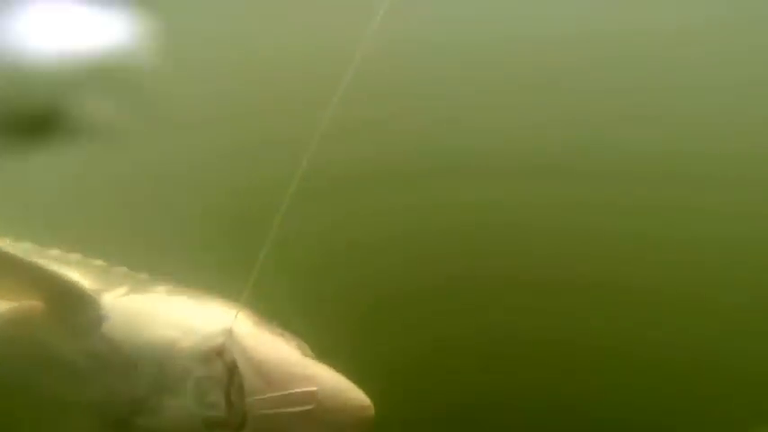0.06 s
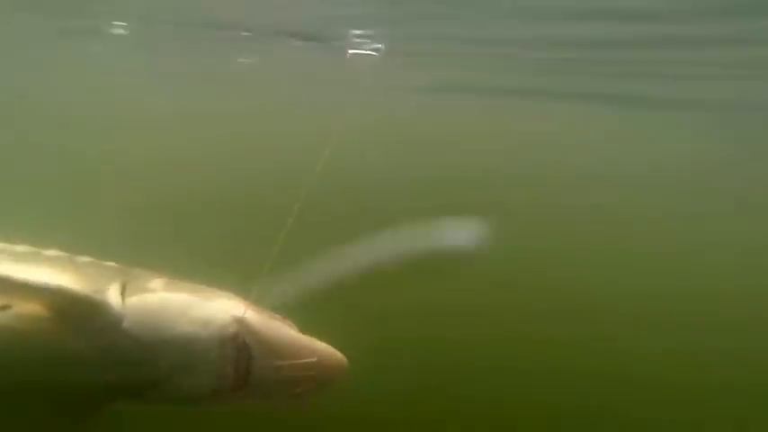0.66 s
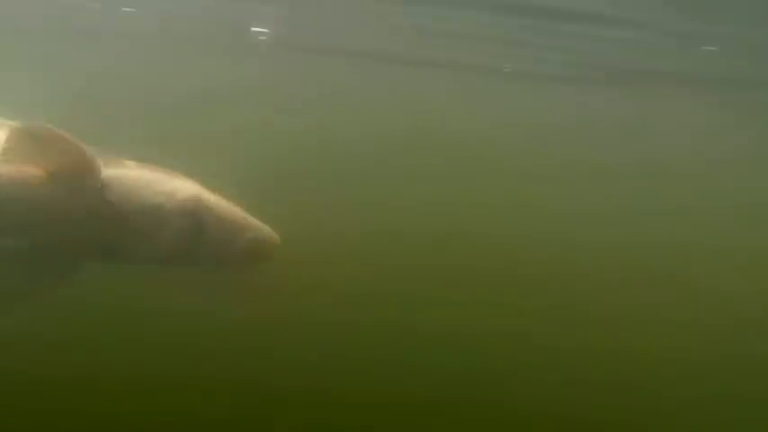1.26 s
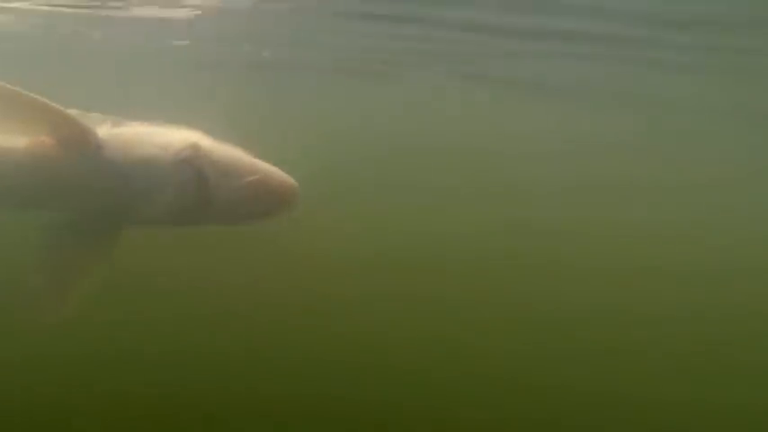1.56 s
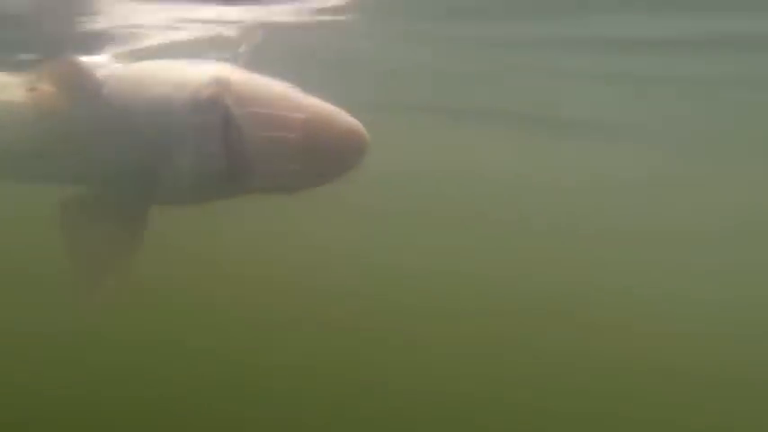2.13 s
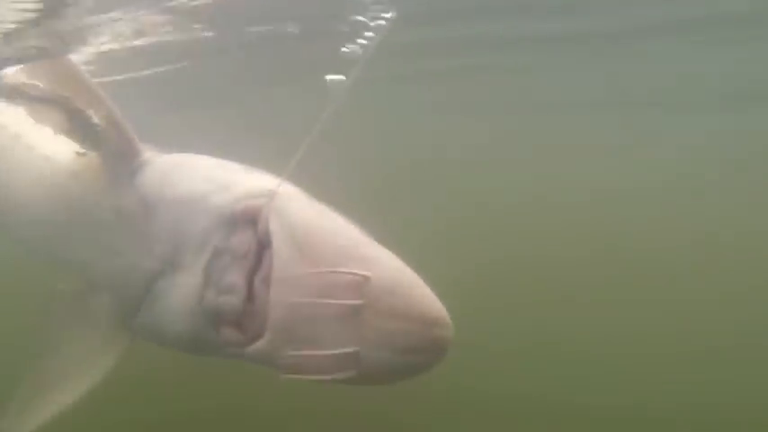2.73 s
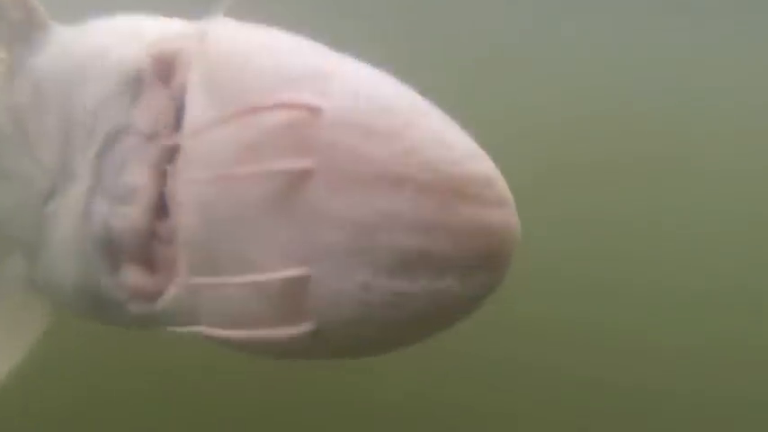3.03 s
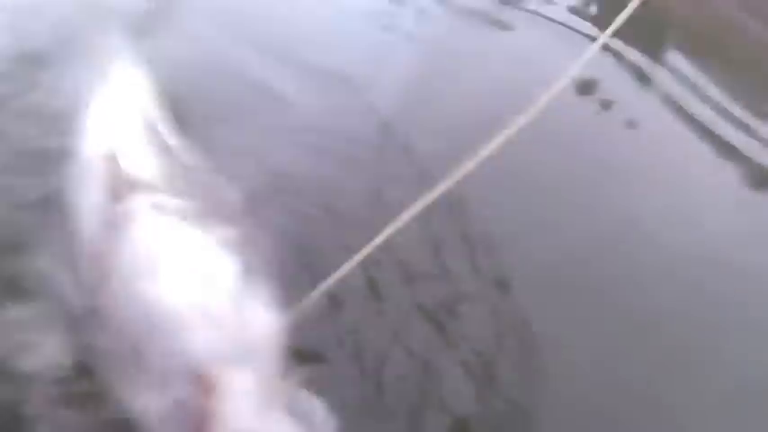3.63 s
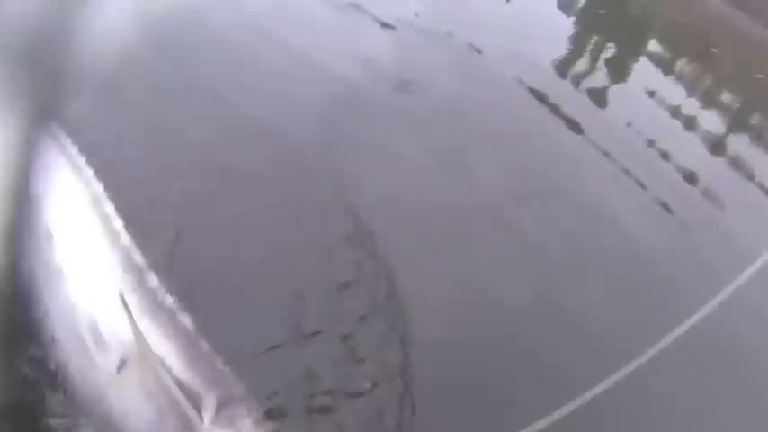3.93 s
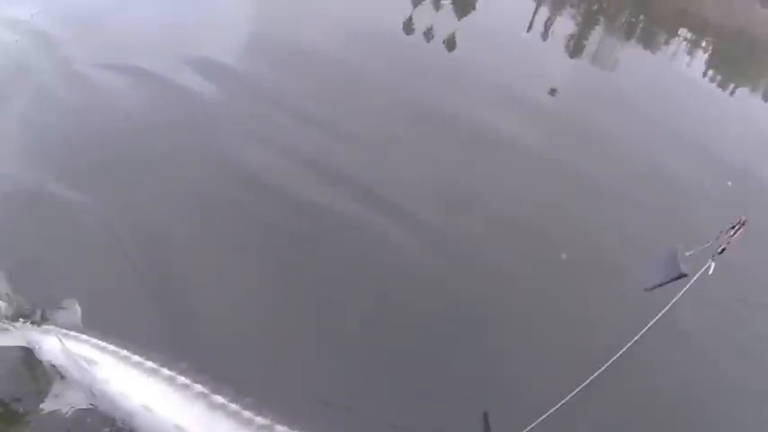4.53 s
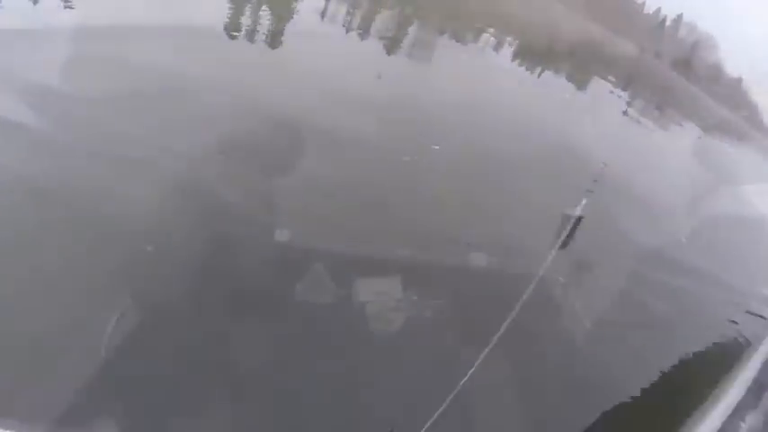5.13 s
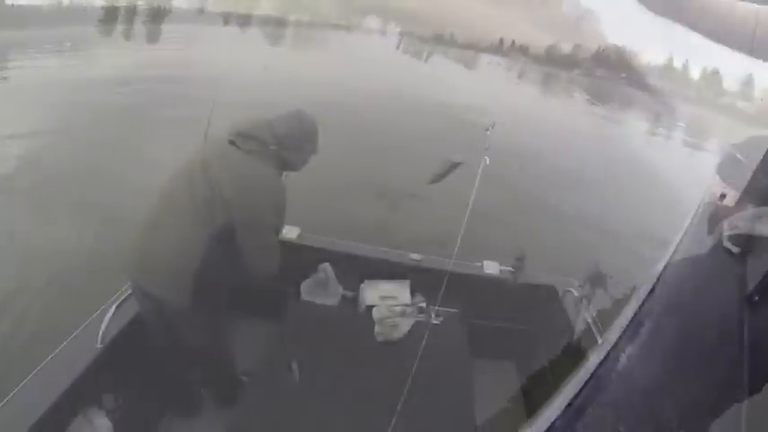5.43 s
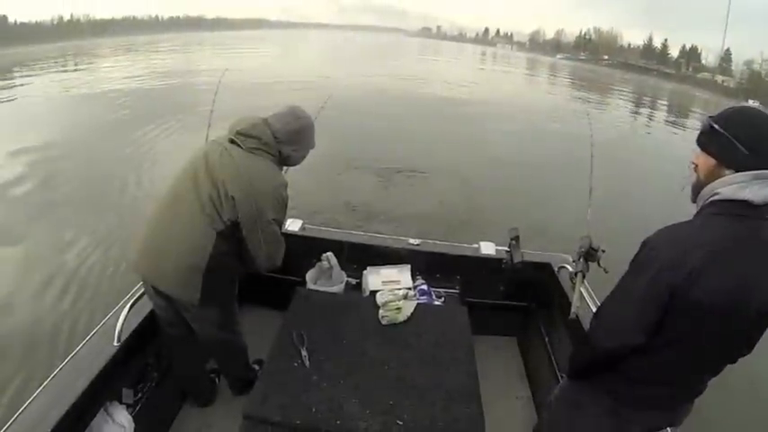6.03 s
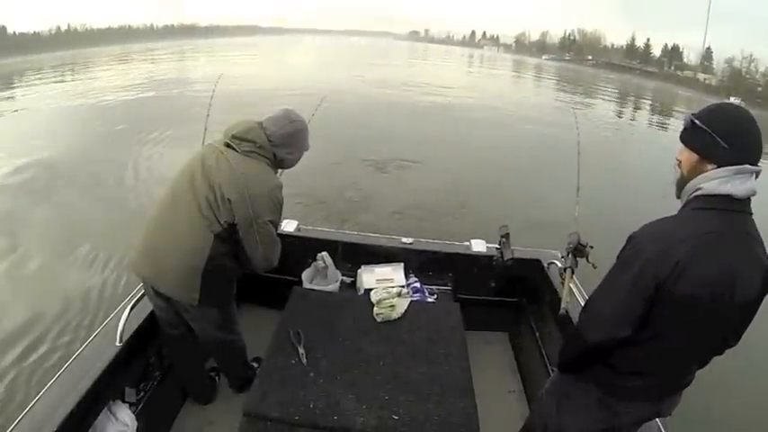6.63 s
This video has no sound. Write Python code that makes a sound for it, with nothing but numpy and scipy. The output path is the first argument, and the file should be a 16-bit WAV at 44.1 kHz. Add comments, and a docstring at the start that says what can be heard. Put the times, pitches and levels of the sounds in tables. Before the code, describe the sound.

From the start, river water churns close around a microphone sealed in a waterproof housing. Gulps, ringing bubbles and fine fizz surge unevenly over a low rumble, with a cluster of sharp pops and knocks between about 0.7 and 1.3 seconds. The bubbling carries on until a loud pop and a deep thump at 3.2 seconds. Around 3.4 seconds the housing breaks the surface with a rising glug, and the churning stops abruptly. Faint drops patter and water runs off, fading by about 5.5 seconds. Meanwhile the grip rumbles, with a dull thump near 4.1 seconds, softer bumps and a small glug around 4.6 to 4.8, and light ticks until 5.4. The last stretch, to about 7 seconds, is very quiet: an idling boat motor's muffled drone swells slightly under a faint hiss and thin, high electronic whine.

```python
"""First, a camera in a waterproof housing is dragged through a river: air tears off it in gulps,
ringing bubbles and fizz. At about 3.4 s it breaks the surface. Then water drains and trickles off
while handling thumps and ticks the housing. At the end, what remains is a boat motor's muffled
drone and the camera's own hiss and whine."""
import sys
import numpy as np
from scipy.fft import rfft, irfft, next_fast_len
from scipy.io import wavfile
from scipy.ndimage import uniform_filter1d, map_coordinates

SR = 44100
rng = np.random.default_rng(int(sys.argv[2]) if len(sys.argv) > 2 else 0)


def wav_out(sig):
    """Save sig, one row per channel (or a flat mono array), as 16-bit PCM at SR to the path in sys.argv[1]."""
    wavfile.write(sys.argv[1], SR, np.round(np.clip(np.atleast_2d(sig).T, -1, 1) * 32767).astype(np.int16))


N = 298998
SURFACE_S = 3.35  # the housing starts to leave the water

# Ringing bubbles beside the housing, then one faint high drip just after it surfaces.
# Each row: start in seconds, peak level in dB, pitch in Hz.
BUBBLES_AND_DRIP = [(0.054, -7, 1400), (0.178, -8.5, 1250), (0.219, -9, 1310), (0.2856, -6, 1240),
                    (0.3376, -4, 3980), (0.3398, 7, 1340), (0.423, -6.5, 1410), (0.431, -4, 504),
                    (0.4407, 3, 1420), (0.61, -11, 587), (0.67, -8.5, 1660), (0.672, -9.5, 5700),
                    (0.7398, -4, 1450), (0.7551, 3, 1320), (0.767, -7, 1310), (0.769, -9, 3420),
                    (0.815, -8.5, 1520), (0.816, -11.5, 4400), (0.856, -7, 2580), (0.947, -7.5, 2200),
                    (0.971, -8, 1190), (1.016, -6, 1540), (1.06, -9, 1330), (1.065, -1, 3200),
                    (1.13, -3, 1250), (1.141, -7.5, 3300), (1.141, -8, 540), (1.1705, 1, 1940),
                    (1.228, -3.5, 1480), (1.262, -10, 533), (1.293, -5.5, 2010), (1.326, -10.5, 530),
                    (1.327, -10, 3500), (1.364, -15.5, 3940), (1.405, -9.5, 990), (1.466, -14, 3100),
                    (1.51, -6.5, 2280), (1.6137, -10.5, 3800), (1.749, -3, 1660), (1.829, -15.5, 5920),
                    (1.886, -6.5, 1490), (2.138, -6.5, 1510), (2.187, -0.5, 1330), (2.245, -5.5, 1520),
                    (2.3222, -9.5, 4560), (2.41, -7.5, 1710), (2.4424, -6.5, 2880), (2.497, -11.5, 4680),
                    (2.5266, -7, 2820), (2.5695, -6, 3100), (2.632, -7, 3230), (2.691, -14, 4620),
                    (2.8455, 0, 2800), (2.8873, -9.5, 1470), (2.9002, -4.5, 3280), (3.03, -5, 1560),
                    (3.047, -6, 1520), (3.092, -7, 1620), (3.09, -8, 3540), (3.105, -9.5, 2960),
                    (3.185, -5.5, 1540), (3.1983, 8, 1525), (3.218, -5.5, 1380), (3.5423, -24, 7470)]
# How the housing passes sound from the water. Each row: frequency in Hz, gain in dB.
WET_HOUSING = [(120, -18), (330, -16.5), (550, -2), (690, -10.5), (900, 0.5), (1130, -3), (1480, 9),
               (2400, -2.5), (3250, 1.5), (5600, -11), (7600, -16.5), (8800, -26), (10300, -18),
               (15500, -37)]
# How it passes drops and ticks in the air. Each row: frequency in Hz, gain in dB.
HOUSING_IN_AIR = [(400, -7.5), (2500, 2), (6000, -12.5), (15000, -23)]


def amp(db):
    """Turn decibels into a number to multiply by."""
    return 10 ** (np.asarray(db) / 20)


def unit(x):
    """Scale x to an average power of 1."""
    return x / np.sqrt(np.mean(x ** 2) + 1e-20)


def curves(rows):
    """Join the rows with straight lines: one value per sample for each column after the time."""
    s, *columns = np.transpose(rows)
    return [np.interp(np.arange(N) / SR, s, column) for column in columns]


def during(span):
    """1 between the span's two times, fading over its last 0.1 s; 0 elsewhere."""
    t = np.arange(N) / SR
    return (t >= span[0]) * np.clip((span[1] - t) * 10, 0, 1)


def wobble(rate):
    """A smooth curve through `rate` random values a second."""
    values = rng.standard_normal(int(N * rate / SR) + 4)
    return map_coordinates(values, [np.arange(N) * rate / SR])


def colour(x, points):
    """Filter x by points that each give a frequency in Hz and a gain in dB."""
    size = 2 * next_fast_len(N // 2 + SR // 2)
    hz, db = np.transpose(points)
    gain = amp(np.interp(np.log(np.fft.rfftfreq(size, 1 / SR) + 1), np.log(hz), db))
    # keeping one half, doubled, makes the filter ring only after a sound, never before it
    cepstrum = irfft(np.log(gain))[:size // 2]
    cepstrum[1:] *= 2
    return irfft(rfft(x, size) * np.exp(rfft(cepstrum, size)))[:N]


def noise(points):
    """Filtered noise with an average power of 1."""
    return unit(colour(rng.standard_normal(N), points))


def even(x, seconds):
    """Hold the power of x near 1 over every stretch of this length."""
    width = int(seconds * SR)
    power = uniform_filter1d(uniform_filter1d(x ** 2, width), width)
    return x / np.sqrt(np.abs(power) + 1e-12)


def place(starts, sounds):
    """Add up short sounds, one a row, at their start times in seconds."""
    index = np.round(np.abs(starts) * SR).astype(int) + np.arange(sounds.shape[1])
    return np.bincount(index.ravel(), sounds.ravel(), N)[:N]


def ring(hz, t60, rise, onset_cycles):
    """Tones that swell in, then fade by 60 dB in t60 seconds as their pitch climbs by the share `rise`."""
    t = np.arange(int(np.max(t60) * SR)) / SR
    age = np.minimum(t / t60, 2)
    phase = 2 * np.pi * hz * t * (1 + rise * age / 2)
    swell = (1 - np.exp(-t * hz / onset_cycles)) ** 2
    return np.sin(phase) * np.exp(-np.log(1000) * age) * swell


def snaps(starts, db, t60, body):
    """Very short bursts of noise, heard through the filter `body`."""
    t = np.arange(SR // 20) / SR
    bursts = rng.standard_normal((len(starts), len(t))) * amp(db - 60 * t / t60)
    return colour(place(starts, bursts), body)


def swarm(span, surge_db, rate, low_hz, high_hz, cycles, spread_db, body=WET_HOUSING):
    """`rate` random bubbles a second: many faint, a few near and loud; small ones are high and short."""
    duration = span[1] - span[0]
    when, smallness, distance, life, climb = rng.random((int(rate * duration), 5)).T[:, :, None]
    starts = span[0] + when * duration
    hz = low_hz * (high_hz / low_hz) ** smallness
    t60 = np.minimum(cycles / hz * 2.19 ** (2 * life - 1), 0.06)
    db = surge_db[(starts * SR).astype(int)] - spread_db * np.log(distance + 0.02)
    tones = amp(db) * ring(hz, t60, rise=0.089 * climb, onset_cycles=0.56)
    return during(span) * even(colour(place(starts, tones), body), seconds=0.32)


def electronics():
    """The microphone hisses; in every cycle the circuits crackle, then give a chirp of buzz and whine."""
    # The tone of three noises. Each row: frequency in Hz, relative level in dB.
    hiss_tone = [(300, 2.5), (2000, -8), (4500, -11.5), (12500, -15.5), (15000, -29)]
    buzz_tone = [(5000, -23.5), (6400, 4), (7200, -8.5), (8200, -3), (10000, -30.5), (12800, -5),
                 (14000, -33.5)]
    crackle_tone = [(2000, -21), (5000, -7), (6600, 8), (8500, -7.5), (11500, -9.5), (14500, -34.5)]
    # The thin whine. Each row: pitch in Hz, level in dB before it is pulsed.
    whine_notes = [(6452, -67.5), (12881, -67)]
    cycle_hz, gap_db, crackle_lead_s = 48, -21.5, 0.00528
    t = np.arange(N) / SR
    chirps = unit(amp(gap_db) + np.maximum(np.sin(2 * np.pi * cycle_hz * (t - 0.001)), 0))
    crackles = unit(np.maximum(np.sin(2 * np.pi * cycle_hz * (t + crackle_lead_s)), 0) ** 4)
    whine = sum(amp(db) * np.sin(2 * np.pi * hz * t + 1.4 * wobble(110)) for hz, db in whine_notes)
    buzz = amp(-66) * chirps * noise(buzz_tone) + amp(-70) * crackles * noise(crackle_tone)
    return amp(-64.5) * noise(hiss_tone) + chirps * whine + buzz


def motor():
    """The boat's idling motor makes a muffled drone and a hum with five overtones."""
    # The motor's loudness. Each row: time in seconds, hum level in dB, drone level in dB.
    levels = [(3.7, -51, -57.5), (5.2, -59.5, -55.5), (6.27, -69.5, -45), (6.5, -66.5, -49)]
    # The drone's tone. Each row: frequency in Hz, relative level in dB.
    drone_tone = [(25, -20), (54, 8), (72, 3), (105, 8), (165, -9.5), (205, -6.5), (300, -37), (9000, -71)]
    hum_hz = 113.4
    phase = 2 * np.pi * hum_hz * np.arange(N) / SR + 0.11 * wobble(1.4)
    hum = sum(amp(-3.5 * k) * np.sin((k + 1) * phase) for k in range(6))
    hum_db, drone_db = curves(levels)
    return amp(hum_db) * hum + amp(drone_db) * noise(drone_tone)


def housing_rumble():
    """Swirling water, then the moving grip, flexes the housing; it settles once it is held still."""
    # The rumble's tone. Each row: frequency in Hz, relative level in dB.
    rumble_tone = [(10, 5), (24, 8), (60, -6.5), (110, -19.5), (250, -30.5), (3000, -110)]
    # Swings of the camera in the air. Each row: time of the peak in seconds, boost in dB.
    swings = [(3.65, 10), (4.15, 8.5), (4.299, 8)]
    flow_db, grip_db, rest_db = -27, -32.5, -53
    still_s, settle_db_per_s, swing_s = 4.83, 17, 0.067
    t = np.arange(N) / SR
    held_db = np.maximum(grip_db - settle_db_per_s * np.maximum(t - still_s, 0), rest_db)
    swing_db = sum(db * np.exp(-((t - s) / swing_s) ** 2) for s, db in swings)
    under = during((0, SURFACE_S))
    level_db = under * flow_db + (1 - under) * (held_db + swing_db)
    return amp(level_db) * even(noise(rumble_tone), seconds=0.048)


def trickle():
    """Drops patter off the housing ever more faintly, and the run-off swishes softly on the river."""
    # The run-off. Each row: time in seconds, level in dB around which it flickers.
    runoff_levels = [(3.5, -50.5), (4.08, -60), (4.23, -45.5), (4.35, -59.5), (4.85, -59), (5.3, -66.5),
                     (6, -82)]
    # The tone of lapping water. Each row: frequency in Hz, relative level in dB.
    lapping_tone = [(300, -15), (700, -2.5), (1200, 3), (2100, -7.5), (4000, -16.5), (8000, -22),
                    (16000, -39.5)]
    draining_s, fade_db_per_s = (3.45, 5.8), 20.5
    runoff_db, = curves(runoff_levels)
    surge_db = 2 * wobble(26)
    drip_db = -44 - fade_db_per_s * np.maximum(np.arange(N) / SR - SURFACE_S, 0)
    drops = swarm(draining_s, surge_db, rate=300, low_hz=1135, high_hz=4500, cycles=16, spread_db=6,
                  body=HOUSING_IN_AIR)
    swish = amp(runoff_db + surge_db) * during(draining_s) * noise(lapping_tone)
    return amp(drip_db) * drops + swish


def handling():
    """Each blow pushes the sealed-in air once and knocks the wall; light touches only tick."""
    # Dull blows. Each row: start in seconds, push level in dB, relative knock level in dB, pitch in Hz.
    blows = [(3.239, 1, -45, 110), (3.258, -30.5, -9, 112.2), (4.052, -38, -13.5, 140),
             (4.057, -5.5, -9, 170), (4.185, -36, -20.5, 145.7), (4.623, -17, -31.5, 800),
             (4.625, -40, -27, 196), (4.832, -17.5, -33.5, 317)]
    # Light touches. Each row: start in seconds, level in dB before the housing filters it.
    touches = [(4.186, -35.5), (4.831, -29), (4.889, -24.5), (5.05, -36.5), (5.092, -29.5), (5.414, -38)]
    starts, push_db, knock_db, hz = np.transpose(blows)[:, :, None]
    push_hz, push_t60, wall_t60 = 27, 0.072, 0.0098
    t = np.arange(SR // 5) / SR
    pushes = amp(push_db - 60 * t / push_t60) * np.sin(2 * np.pi * push_hz * t)
    wall = ring(hz, wall_t60, rise=0, onset_cycles=0.099)
    wall += amp(-14.5) * ring(810, wall_t60, rise=0, onset_cycles=0.35)
    tick_starts, tick_db = np.transpose(touches)[:, :, None]
    ticks = snaps(tick_starts, tick_db, t60=0.009, body=HOUSING_IN_AIR)
    return ticks - place(starts, pushes) - place(starts, amp(knock_db + 8.5) * wall)


def glugs():
    """Air pockets wobble free or open at the surface; the more the pitch climbs, the more they flutter."""
    # Each row: start in seconds, level in dB before fading, first pitch in Hz, rise (1 adds 100%).
    pockets = [(0.008, 3.5, 930, 0.02), (0.088, 8, 820, 0.02), (3.214, 5.5, 770, 0.48),
               (3.399, 2, 986, 1.6), (3.436, -11, 1636, .4), (4.65, -12, 352, 0.23),
               (4.703, -24.5, 965, .8)]
    starts, db, hz, rise = np.transpose(pockets)[:, :, None]
    tones = amp(db) * ring(hz, t60=0.045, rise=rise, onset_cycles=7.94)
    flutter_db = 3.7 * rise * wobble(700)[:tones.shape[1]]
    return place(starts, tones * amp(flutter_db))


def surges():
    """Swells in dB for the small bubbles: air tears off unevenly, and ringing bubbles shed small ones."""
    starts = np.transpose(BUBBLES_AND_DRIP)[0][:, None]
    fade = np.exp(-np.arange(SR // 10) / SR / 0.014)
    shed = place(starts, np.ones_like(starts) * fade)
    return 3.4 * wobble(55) + 2 * np.minimum(shed, 1)


def churn():
    """Air dragged under breaks into gulps, bubbles, fizz and spray, ending as the housing surfaces."""
    # How hard the water churns. Each row: time in seconds, base level in dB.
    churn_levels = [(0.0, -23.5), (0.32, -21.5), (0.355, -39), (0.41, -27), (0.47, -34), (0.58, -32.5),
                    (0.7, -22.5), (1.13, -23.5), (1.19, -32.5), (1.32, -25.5), (1.69, -31), (1.87, -27.5),
                    (2.0, -29), (2.22, -24.5), (2.3, -29), (2.69, -28), (2.76, -36.5), (3.15, -21.5),
                    (3.27, -33.5), (3.39, -25), (3.46, -44.5)]
    # How finely air is torn. Each row: time in seconds, then gulps, fizz and spray in dB over the base.
    fineness = [(0, -3.5, -8, -29.5), (.5, 2.5, -6.5, -18), (.9, -1.5, -6.5, -16), (1.3, 5, -4.5, -15.5),
                (2.1, -1, -8, -26.5), (2.7, -4, -4, -19.5), (3.18, -5, -2.5, -13.5), (3.42, -15, -8, -11.5)]
    under_s = (0, 3.6)
    base_db, = curves(churn_levels)
    gulp_db, fizz_db, spray_db = base_db + np.array(curves(fineness))
    surge_db = surges()
    gulps = swarm(under_s, surge_db, rate=280, low_hz=255.5, high_hz=1050, cycles=14, spread_db=1.5)
    bubbles = swarm(under_s, surge_db, rate=600, low_hz=1082, high_hz=2314, cycles=26, spread_db=3.5)
    fizz = swarm(under_s, surge_db, rate=550, low_hz=2332, high_hz=4240, cycles=38, spread_db=7.5)
    spray = swarm(under_s, surge_db, rate=330, low_hz=4540, high_hz=13340, cycles=35, spread_db=7.5)
    # Surges push water against the walls. Each row: frequency in Hz, relative level in dB.
    slosh_tone = [(40, 0.5), (80, 0.5), (350, -10), (1000, -7.5), (9000, -100)]
    slosh = during(under_s) * even(noise(slosh_tone) * amp(1.26 * surge_db), seconds=0.54)
    # they also burst the thinnest films in spurts of fine hiss
    hiss = swarm(under_s, 2 * surge_db, rate=3000, low_hz=5486, high_hz=15200, cycles=6.8, spread_db=7.5)
    return (amp(gulp_db) * gulps + amp(base_db + 1.32) * bubbles + amp(fizz_db) * fizz
            + amp(spray_db) * spray + amp(spray_db - 5) * hiss + amp(gulp_db - 2) * slosh)


def slaps():
    """A collapsing air pocket throws water on the wall: a dull knock with a hard crack."""
    # Each row: start in seconds, relative level in dB.
    collapses = [(0.221, -11.5), (0.7405, -8.5), (0.947, -2.5), (1.0595, -2.5), (1.131, -9), (1.1703, 0.5),
                 (1.228, -3.5), (2.3226, -11), (3.1983, -7)]
    starts, db = np.transpose(collapses)[:, :, None]
    knocks = amp(db) * ring(hz=479, t60=0.011, rise=0, onset_cycles=0.06)
    return place(starts, knocks) + amp(-9) * snaps(starts, db, t60=0.013, body=WET_HOUSING)


def bubbles_and_drip():
    """A neck of air snaps shut and shoves the wall, and the freed bubble rings; one drip rings alike."""
    starts, db, hz = np.transpose(BUBBLES_AND_DRIP)[:, :, None]
    typical_hz, typical_t60, gentle_db = 1496, 0.013, -7
    # smaller, higher bubbles die sooner, and so do those more violent than gentle_db
    violence = amp(np.maximum(db, gentle_db))
    t60 = typical_t60 * (typical_hz / hz) ** 0.19 / violence ** 0.24
    tones = ring(hz, t60, rise=0.066, onset_cycles=0.32)
    tones *= amp(db) / np.abs(tones).max(axis=1, keepdims=True)
    wall = ring(hz=263, t60=0.0032, rise=0, onset_cycles=0.08)
    shoves = amp(db - 13) * np.minimum(typical_hz / hz, 1) * wall
    clicks = amp(-23) * snaps(starts, db, t60=0.016, body=WET_HOUSING)
    return place(starts, tones) + place(starts, shoves) + clicks


def scene():
    """Everything reaches the one microphone inside the housing."""
    water = bubbles_and_drip() + slaps() + churn() + glugs() + trickle()
    return (water + housing_rumble() + handling() + motor() + electronics())[None]


def record(dry):
    """The loudest peaks are squashed, and the highest treble is cut off."""
    top_hz = 15800
    clipped = dry / (1 + np.abs(dry) ** 10) ** (1 / 10)
    size = next_fast_len(N + SR // 2)
    kept = np.fft.rfftfreq(size, 1 / SR) < top_hz
    return irfft(rfft(clipped, size) * kept, size)[:, :N]


dry = scene()
out = record(dry)
wav_out(out)
```